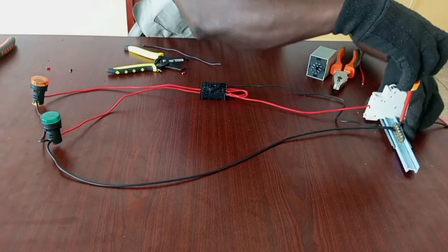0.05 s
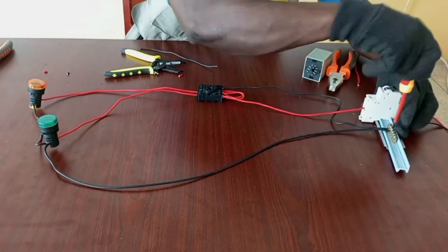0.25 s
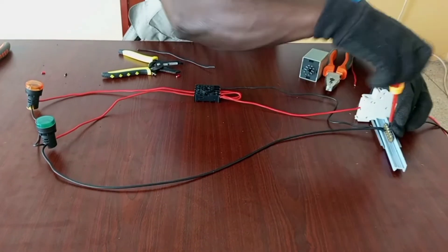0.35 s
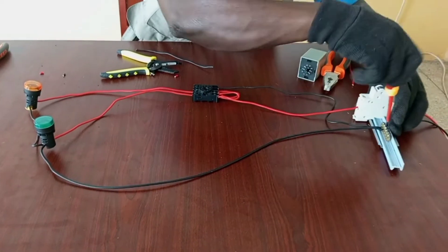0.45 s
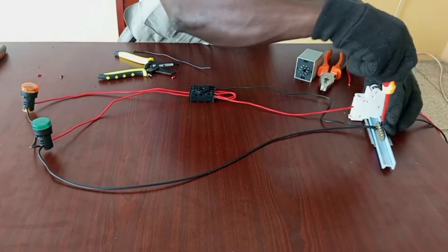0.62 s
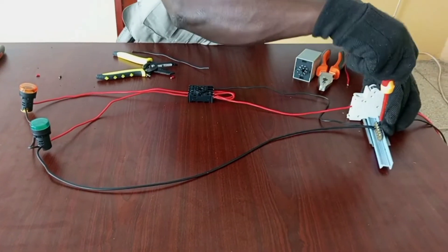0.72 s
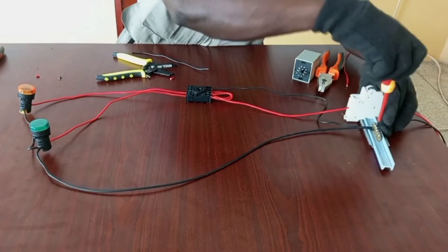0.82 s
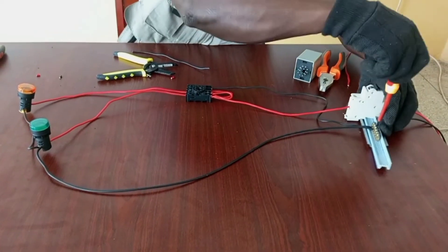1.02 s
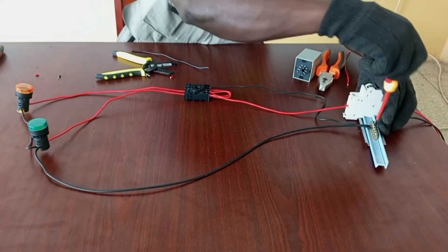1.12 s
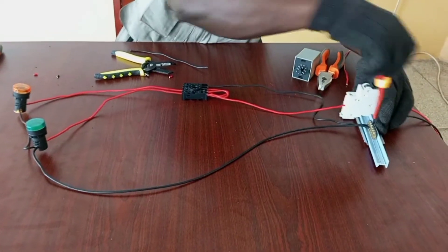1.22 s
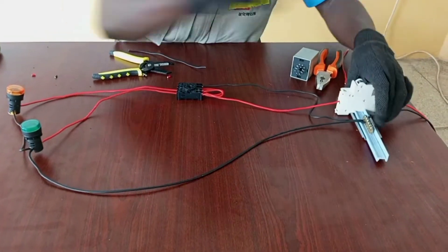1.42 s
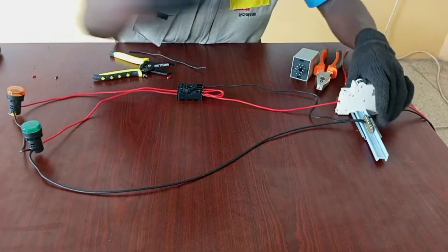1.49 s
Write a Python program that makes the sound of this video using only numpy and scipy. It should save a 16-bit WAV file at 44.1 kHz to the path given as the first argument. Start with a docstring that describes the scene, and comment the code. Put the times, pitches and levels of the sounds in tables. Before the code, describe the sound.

A screw terminal tightened by a screwdriver: at about 0.2 seconds a crack and short piercing squeak slow into a gritty creak. Two sharp, bright clicks follow near 0.5, then three quick ones at 0.61-0.66, with steel and plastic ringing into the hard room. A brief rub fades around 0.75; a faint double blade tick comes at 1.3. Soft hand bumps and very low room noise remain.

```python
"""In a hard, quiet room, a screwdriver tightens the screw terminal of a breaker on a table.
The screw squeaks by stick-slip, a pulse train that slows as it binds; then it slips in sharp clicks,
cracks of noise with decaying modes of the steel, near 10 kHz, and of the plastic housing.
The blade rubs in its slot and ticks as it lifts out, by shaped noise and short modes.
Gloved hands bump softly, as low sine swells, over low filtered room noise and a faint hum."""
import sys
import numpy as np
from scipy import signal
from scipy.fft import rfft, irfft, next_fast_len
from scipy.io import wavfile
from scipy.ndimage import uniform_filter1d

SR = 44100
rng = np.random.default_rng(int(sys.argv[2]) if len(sys.argv) > 2 else 0)


def transcribe(signal):
    """Save signal, clipped to [-1, 1], as a 16-bit WAV file at the path in sys.argv[1]."""
    frames = np.atleast_2d(signal).T
    limited = np.clip(frames, -1, 1)
    pcm = np.round(limited * 32767).astype(np.int16)
    wavfile.write(sys.argv[1], SR, pcm)


N = 68355

# Room noise spectrum: (frequency [Hz], relative gain [dB])
AIR_COLOUR = [(20, -31), (45, -26), (65, -9.5), (105, -11), (140, -2.5), (190, -5), (320, -5), (600, -7.5),
              (1100, -8), (1900, -12), (3000, -18), (5300, -22.5), (7900, -31), (10100, -25.5),
              (11200, -33.5), (15500, -41.5)]
# Room noise loudness: (time [s], RMS level before the suppressor [dB])
AIR_LEVEL = [(0, -64), (.3, -64.5), (.6, -68), (.9, -65), (1.2, -64.5), (1.55, -64)]
HUM_HZ, HUM_RMS_DB = 438.7, -79.5

# Hands on the table: (time [s], frequency [Hz], level [dB])
HAND_BUMPS = [(.002, 147.7, -67), (.145, 137.3, -61), (.225, 597, -60), (.65, 96, -69.5),
              (0.691, 315, -63.5), (.70, 227, -67.5), (0.826, 288, -64), (.965, 435, -65), (1.085, 70, -67),
              (1.235, 150, -65), (1.341, 145, -58), (1.505, 162.5, -62.5), (1.52, 457, -61.5)]
BUMP_SWELL_S = 0.015

# Light touches of the blade: (time [s], level [dB])
BLADE_TOUCHES = [(.065, -68.5), (1.289, -45.5), (1.3105, -51.5), (1.495, -67)]
# Modes of the blade: (frequency [Hz], relative level [dB], swell time [s])
BLADE_MODES = [(3300, -23, 0.0044), (4700, -10, 0.0021), (5630, -5.5, 0.0018), (6210, -1, 0.0012),
               (7570, -4.5, .0016), (8400, -6, 0.0014), (10630, -2, .0013), (14500, -5, .0008)]
# Spectrum of the sliding blade: (frequency [Hz], gain [dB])
SCRAPE_COLOUR = [(1000, -24), (3500, -17.5), (4800, -2.5), (8000, 3), (11000, -6), (16000, -18)]
CONTACT_DB, CONTACT_SWELL_S = -6, 0.001  # noise at the touch, relative to it
SCRAPE_DB, SCRAPE_SWELL_S = -14, 0.014  # noise of the slide, relative to the touch

# Spectrum of the blade grinding in the slot: (frequency [Hz], gain [dB])
RUB_COLOUR = [(300, -29.5), (900, -24), (1300, -1.5), (1600, -8.5), (2000, 0.5), (2350, -1), (2700, -7.5),
              (3100, -6), (4200, 2), (5600, 1.5), (6500, -20), (12000, -46)]
RUB_START_S, RUB_DB, RUB_SWELL_S = 0.68, -45.5, 0.035

# Slips of the screw: (time [s], steel level [dB], housing level [dB], crack level [dB], press [0-1])
SCREW_SLIPS = [(0.2043, -32.5, -23.5, -14, 0.9), (0.2376, -23.5, -23, -43.5, 0.4),
               (0.2395, -22, -21.5, -46, .5), (0.2424, -22.5, -24.5, -46, .5), (.2520, -22, -24.5, -37, .5),
               (0.4969, -17, -15, -17.5, 0.34), (0.5157, -19.5, -15.5, -26.5, 0),
               (0.6123, -16.5, -20, -32.5, 1), (0.6364, -17.5, -19, -33, 0.94),
               (.6570, -17.5, -18.5, -33.5, 0.84)]
# Modes of the steel: (frequency [Hz], relative level [dB], swell time [s])
STEEL_MODES = [(10226, 0.5, 0.0007), (10040, -15, .0015), (10610, -18, 0.0013), (14900, -26.5, 0.00055)]
# Modes of the housing under a light or a firm press:
# (frequency [Hz], relative level light press [dB], relative level firm press [dB], swell time [s])
HOUSING_MODES = [(1619, -29, -47, 0.0022), (1830, -40.5, -32, 0.0031), (2924, -22.5, -24, 0.0021),
                 (3370, -22, -33, .0014), (3974, -29.5, -23, 0.0012), (4713, -28, -26.5, 0.0013),
                 (5664, -21.5, -16, 0.00061), (7542, -15, -12.5, 0.0007)]
# Spectrum of the crack: (frequency [Hz], gain [dB])
CRACK_COLOUR = [(400, -39), (1500, -23), (2300, -14), (3000, -10), (5000, -4), (6500, -10.5), (7500, -4.5),
                (8700, -4.5), (10500, 3), (12000, -13.5), (13400, -20.5), (15000, -9.5), (16500, -29)]
CRACK_SWELL_S = 0.00032
DETUNE, MODE_SCATTER_DB = 0.0074, 0.42  # random spread of each mode: fraction of its frequency, dB

# The squeaking screw: (time [s], slip rate [1/s], level before SQUEAK_GAIN_DB [dB], roughness [0-1])
SQUEAK_COURSE = [(.185, 1690, -53, 0.13), (0.19, 1700, -51, 0.1), (0.1916, 1730, -40, 0.05),
                 (.201, 1570, -38.5, 0), (.207, 1560, -34, 0.05), (.210, 1720, -31.5, 0.04),
                 (.220, 1400, -31.5, 0.03), (.224, 800, -33, .08), (0.236, 450, -32.5, .08),
                 (0.246, 330, -47, .08), (.252, 330, -59.5, .1)]
# Spectrum of the squeak: (frequency [Hz], gain [dB])
SQUEAK_COLOUR = [(600, -34), (1100, -30.5), (1650, -9), (2050, -17), (2600, -16), (3300, -11),
                 (4600, -10.5), (5600, -10), (6800, -18), (7800, -15), (8600, -20), (10200, 4),
                 (11000, -17), (13400, -37.5), (14800, -27.5), (16500, -41.5)]
SQUEAK_GAIN_DB, GRIT_DB = 9, -2.5  # grit is relative to the course level

# Reverberation time: (frequency [Hz], time to fall 60 dB [s])
ROOM_T60 = [(500, .5), (1600, 0.89), (4000, 1), (7500, 0.67), (10200, 0.71), (15000, 0.72)]
# Spectrum of the reflected sound: (frequency [Hz], gain [dB])
ROOM_COLOUR = [(300, -9.5), (1500, 0), (1900, 2), (2400, -1.5), (2900, -1.5), (4200, 4.5), (5500, -4),
               (6500, -8), (7700, -11.5), (8600, -11), (9600, -5), (10300, -3.5), (11200, -11),
               (12000, -24.5), (13700, -20), (15000, -16.5)]
# First wall echoes: (delay [s], level relative to the whole tail [dB])
WALL_ECHOES = [(.0125, -19), (.0165, -13.5), (0.021, -11), (.032, -10.5)]
TABLE_ECHO_S, TABLE_ECHO_DB, TABLE_ECHO_SPREAD = 0.0021, -9, 0.11  # spread is a fraction of the delay
BUILD_UP_S, EARLY_DB = 0.031, -2  # the diffuse tail is weaker until it has built up
SQUEAK_WET_DB, CLICK_WET_DB, TICK_WET_DB = -5.5, -3, -13

SUPPRESS_ABOVE_HZ, SUPPRESS_BELOW_DB, SUPPRESS_DEPTH_DB, SUPPRESS_KNEE_DB = 1800, -58, 6, 1
TOP_HZ = 16800


def amp(db):
    """Decibel law: 20 dB is a factor of ten in amplitude."""
    return 10 ** (np.asarray(db) / 20)


def unit(x):
    """Normalisation to an RMS value of one."""
    return x / np.sqrt(np.mean(x ** 2) + 1e-20)


def along(points, hz):
    """Linear interpolation of (frequency, value) points on a logarithmic frequency axis."""
    f, value = np.transpose(points)
    return np.interp(np.log(hz + 1), np.log(f + 1), value)


def filtered(x, response):
    """Linear filtering: the spectrum of x is multiplied by a response of frequency."""
    m = next_fast_len(N + SR // 2)
    return irfft(rfft(x, m) * response(np.fft.rfftfreq(m, 1 / SR)), m)[:N]


def coloured(x, points):
    """Minimum-phase filtering: folding the cepstrum makes the (frequency, dB) gains causal."""
    m = 2 * next_fast_len(N)
    gains = amp(along(points, np.fft.rfftfreq(m, 1 / SR)))
    cepstrum = irfft(np.log(gains))
    cepstrum[1:m // 2] *= 2
    cepstrum[m // 2 + 1:] = 0
    return irfft(rfft(x, m) * np.exp(rfft(cepstrum)))[:N]


def swell(start_s, swell_s):
    """Transient envelope: a rounded rise that peaks at one, swell_s after the start, then dies away."""
    u = np.clip((np.arange(N) / SR - start_s) / swell_s, 0, 50)
    return (u * np.exp(1 - u)) ** 2


def ring(start_s, modes):
    """Modal superposition: a struck body sounds as a sum of decaying sines, varied at each strike."""
    t = np.arange(N) / SR - start_s
    out = np.zeros(N)
    for hz, db, swell_s in modes:
        level = amp(db + MODE_SCATTER_DB * rng.normal())
        mode_hz = hz * (1 + DETUNE * rng.normal())
        out += level * swell(start_s, swell_s) * np.sin(2 * np.pi * mode_hz * t)
    return out


def room_tail():
    """Reverberant decay: noise dies exponentially at each frequency, with discrete wall echoes added."""
    hz, t, spectrum = signal.stft(rng.standard_normal(SR), SR, nperseg=256)
    decay = amp(-60 * t / along(ROOM_T60, hz)[:, None])
    tail = signal.istft(spectrum * decay, SR, nperseg=256)[1]
    early = np.arange(len(tail)) / SR < BUILD_UP_S
    tail = tail * np.where(early, amp(EARLY_DB), 1)
    tail = tail / np.linalg.norm(tail)
    for delay_s, db in WALL_ECHOES:
        tail[round(delay_s * SR)] += amp(db)
    return tail


def in_room(x, wet_db):
    """Reflection: direct sound, its bounce off the table top and a fresh room tail add together."""
    wet = coloured(signal.fftconvolve(x, room_tail())[:N], ROOM_COLOUR)
    lag_s = TABLE_ECHO_S * (1 + TABLE_ECHO_SPREAD * rng.normal())
    # a phase turn proportional to frequency is a pure delay
    bounce = filtered(x, lambda hz: np.exp(-2j * np.pi * hz * lag_s))
    return x + amp(TABLE_ECHO_DB) * bounce + amp(wet_db) * wet


def air():
    """Broadband ambience: random noise with a low-weighted spectrum, plus the pure tone of a faint hum."""
    t = np.arange(N) / SR
    level = amp(np.interp(t, *np.transpose(AIR_LEVEL)))
    noise = unit(coloured(rng.standard_normal(N), AIR_COLOUR))
    hum = np.sqrt(2) * np.sin(2 * np.pi * HUM_HZ * t)  # RMS of one
    return level * noise + amp(HUM_RMS_DB) * hum


def bumps():
    """Soft impact: each dull push of a hand is a low sine under a slow, rounded envelope."""
    t = np.arange(N) / SR
    out = np.zeros(N)
    for start_s, hz, db in HAND_BUMPS:
        out += amp(db) * swell(start_s, BUMP_SWELL_S) * np.sin(2 * np.pi * hz * (t - start_s))
    return out


def ticks():
    """Light impact and sliding friction: the loose blade rings at each touch and slides a little."""
    friction = coloured(rng.standard_normal(N), SCRAPE_COLOUR)
    out = np.zeros(N)
    for start_s, db in BLADE_TOUCHES:
        contact = amp(CONTACT_DB) * swell(start_s, CONTACT_SWELL_S)
        slide = amp(SCRAPE_DB) * swell(start_s, SCRAPE_SWELL_S)
        out += amp(db) * (ring(start_s, BLADE_MODES) + friction * (contact + slide))
    return in_room(out, TICK_WET_DB)


def rub():
    """Sliding friction: the blade grinds briefly in the slot after the last slip, as filtered noise."""
    friction = coloured(rng.standard_normal(N), RUB_COLOUR)
    return amp(RUB_DB) * swell(RUB_START_S, RUB_SWELL_S) * friction


def clicks():
    """Impulsive excitation: each slip cracks, and rings the modes of the steel and plastic housing."""
    out = np.zeros(N)
    for start_s, steel_db, housing_db, crack_db, press in SCREW_SLIPS:
        burst = rng.standard_normal(N) * swell(start_s, CRACK_SWELL_S)
        crack = amp(crack_db) * coloured(burst, CRACK_COLOUR)
        steel = amp(steel_db) * ring(start_s, STEEL_MODES)
        # how firmly the housing is pressed shifts the balance of its modes
        housing_modes = [(hz, np.interp(press, [0, 1], [light_db, firm_db]), swell_s)
                         for hz, light_db, firm_db, swell_s in HOUSING_MODES]
        housing = amp(housing_db) * ring(start_s, housing_modes)
        out += in_room(steel + housing + crack, CLICK_WET_DB)
    return out


def squeak():
    """Stick-slip friction: each release is a pulse; the train is fast, then slows as the screw binds."""
    t = np.arange(N) / SR
    course_s, rate, db, rough = np.transpose(SQUEAK_COURSE)
    active = (t > course_s[0]) & (t < course_s[-1])
    # a slip falls wherever the accumulated rate passes a whole number
    slip_count = np.cumsum(np.interp(t, course_s, rate) * active) / SR
    times = np.interp(np.arange(1, int(slip_count[-1])), slip_count[active], t[active])
    rates = np.interp(times, course_s, rate)
    roughness = np.interp(times, course_s, rough)

    # roughness scatters both the timing and the size of the slips
    chance = rng.standard_normal((len(times), 2))
    times = times + 0.5 * roughness * chance[:, 0] / rates
    sizes = amp(np.interp(times, course_s, db)) * np.exp(roughness * chance[:, 1])
    sizes = sizes * np.sqrt(SR / rates)  # sparser pulses are larger, to hold the power

    # band-limited pulses fall between samples
    near = np.round(times * SR).astype(int)[:, None] + np.arange(-8, 9)
    shapes = sizes[:, None] * np.sinc(near - times[:, None] * SR)
    pulses = np.bincount(near.ravel(), shapes.ravel(), N)

    grit_level = active * amp(np.interp(t, course_s, db) + GRIT_DB)
    grit_level = grit_level * np.sqrt(np.abs(np.interp(t, course_s, rough)))
    grit = grit_level * rng.standard_normal(N)
    return in_room(amp(SQUEAK_GAIN_DB) * coloured(pulses + grit, SQUEAK_COLOUR), SQUEAK_WET_DB)


def scene():
    """Superposition: the sounds add linearly, from the background to the screw."""
    return (air() + bumps() + ticks() + rub() + clicks() + squeak())[None]


def record(dry):
    """Downward expansion: a noise suppressor lowers faint treble; a band limit then removes the top."""
    treble = filtered(dry[0], lambda hz: 1 - 1 / (1 + (hz / SUPPRESS_ABOVE_HZ) ** 2))
    power = np.abs(uniform_filter1d(treble ** 2, size=900))  # mean over about 20 ms
    level_db = 10 * np.log10(power + 1e-14)
    shut = 0.5 * (1 - np.tanh((level_db - SUPPRESS_BELOW_DB) / SUPPRESS_KNEE_DB))  # 0 open, 1 shut
    out = dry[0] + treble * (amp(-SUPPRESS_DEPTH_DB * shut) - 1)
    return filtered(out, lambda hz: hz < TOP_HZ)[None]


dry = scene()
out = record(dry)
transcribe(out)
```